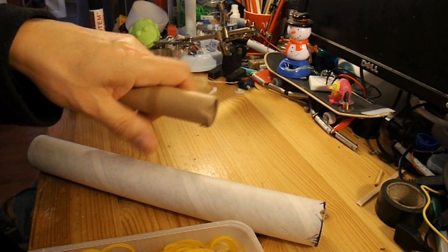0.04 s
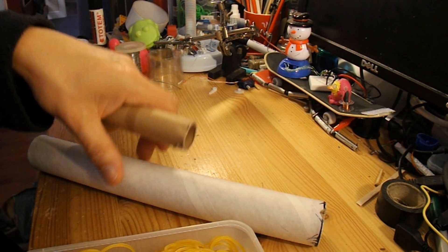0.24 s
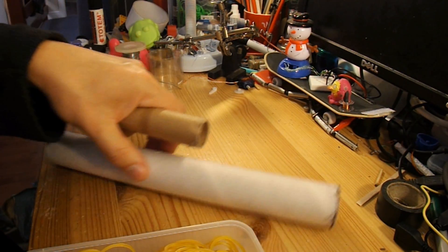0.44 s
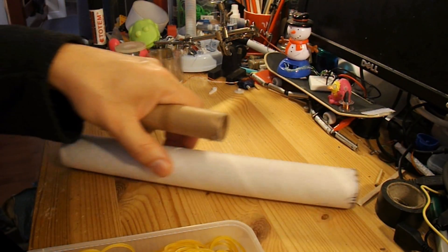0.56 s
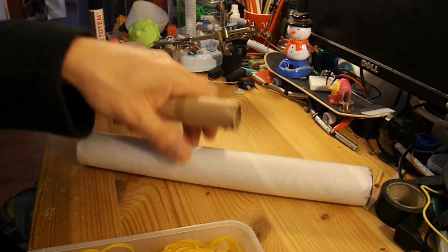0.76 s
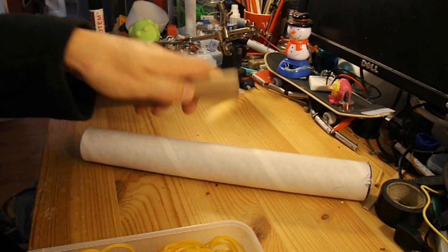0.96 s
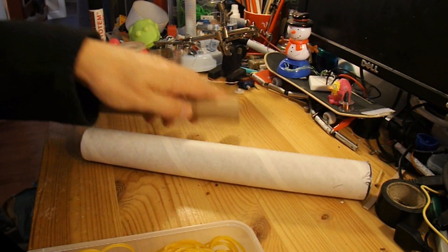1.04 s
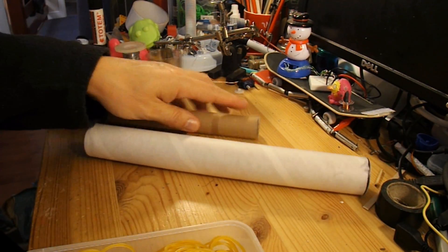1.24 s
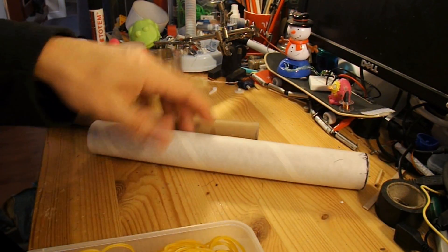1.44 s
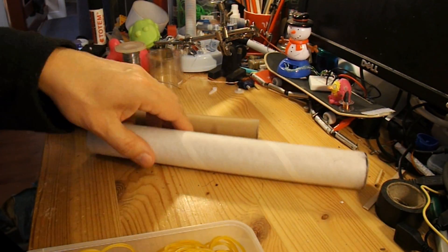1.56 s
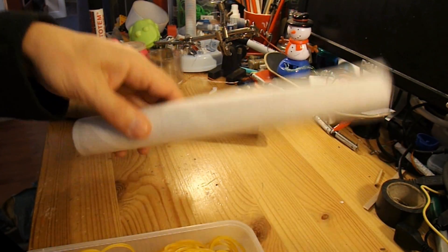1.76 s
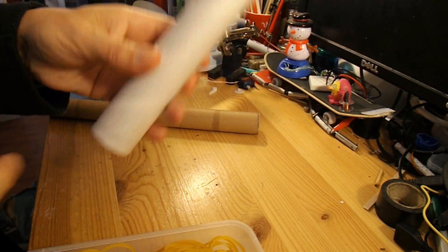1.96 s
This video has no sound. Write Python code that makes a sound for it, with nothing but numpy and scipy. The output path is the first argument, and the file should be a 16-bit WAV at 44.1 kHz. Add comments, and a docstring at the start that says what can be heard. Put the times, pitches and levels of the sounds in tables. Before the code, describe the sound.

Cardboard tubes handled on a wooden desk, with one brief clattering knock as one is set down.

```python
"""First, fingers brush cardboard close to the microphone, over a soft hiss and a thin electrical whine.
The place is a small room, with two cardboard tubes on a wooden desk. One tube slides over the wood in
tiny slips, sings faintly and gives a few sharp little ticks. The other is set down, knocks end to end
and settles, tube and desk ringing together. Near echoes and a short room tail follow the handling."""
import sys
import numpy as np
from scipy import signal
from scipy.fft import rfft, irfft
from scipy.io import wavfile

SR = 44100
rng = np.random.default_rng(int(sys.argv[2]) if len(sys.argv) > 2 else 0)


def waveform_to_disk(signal):
    """Save audio, clipped to [-1, 1], as 16-bit WAV at the path in sys.argv[1]."""
    frames = np.transpose(np.atleast_2d(signal))
    scaled = np.clip(frames, -1, 1) * 32767
    samples = np.round(scaled).astype(np.int16)
    wavfile.write(sys.argv[1], SR, samples)


N = 88508

# Levels in the tables are relative.
# spectrum of the hiss: f/Hz, level/dB
HISS_COLOUR = [(25, -17), (80, -17.5), (160, -10.5), (300, -4.5), (550, 0), (1100, -2), (1600, -4.5),
               (2400, -3.5), (2680, 0), (3100, -7.5), (5500, -13), (7000, -11.5), (9500, -7.5),
               (12500, -13.5), (16000, -17)]
# likeness of left and right in the hiss: f/Hz, correlation/0-1
HISS_LIKENESS = [(50, .9995), (1000, 1), (2200, 1), (3800, 1), (7500, 0), (14000, .05)]
# echoes off things near the desk: delay/s, gain
NEAR_ECHOES = [(.0027, .14), (.0058, 0.072), (.0078, 0.12)]
# the room's decay: f/Hz, t60/s
ROOM_DECAY = [(120, 0.62), (300, 0.27), (1000, 0.13), (3000, .19), (8000, 0.18), (15000, 0.081)]
# what the room returns: f/Hz, level/dB
ROOM_COLOUR = [(150, -3), (500, -2.5), (1100, 0.5), (2500, -1), (6000, 0.5), (12000, 2)]
# likeness of left and right in the room's tail: f/Hz, correlation/0-1
ROOM_LIKENESS = [(50, 1), (1000, 1), (3000, 1), (7000, 0.57), (14000, 0)]
# fingers brushing the card: t/s, level/dB
BRUSH_STROKE = [(0, -58), (.07, -64.5), (.22, -62.5), (.3, -74), (.42, -62), (.53, -55), (.6, -58.5),
                (.72, -56), (.78, -63), (.89, -68.5), (.97, -57), (1.1, -60.5), (1.15, -63), (1.49, -64.5),
                (1.525, -53.5), (1.57, -60.5), (1.62, -55.5), (1.66, -60), (1.745, -54), (1.795, -66.5),
                (1.84, -64), (2.01, -62)]
# spectrum of fingers on card: f/Hz, level/dB
BRUSH_COLOUR = [(880, -50), (1500, -16), (2210, -19), (2860, -18.5), (3880, -10.5), (5170, -8), (6890, -3),
                (10100, -12), (13500, -20), (15400, -24), (16000, -54)]
# card sliding on wood: t/s, level/dB
SLIDE_STROKE = [(0, -68), (.25, -78), (.39, -73), (.48, -55), (.55, -56.5), (.605, -64.5), (.64, -58.5),
                (.705, -54), (.76, -67.5), (.9, -79), (.96, -61.5), (1.03, -72), (1.09, -65.5),
                (1.16, -67.5), (1.6, -63.5), (1.8, -84), (1.89, -74.5), (1.94, -62), (2.01, -66.5)]
# spectrum of card on wood: f/Hz, level/dB
SLIDE_COLOUR = [(47, -54), (80, -21), (119, -7), (190, -20), (246, -5.5), (429, -6.5), (758, -7.5),
                (1040, -3), (1320, -3.5), (2000, -12.5), (2260, -3.5), (3360, -18.5), (3790, -6.5),
                (4430, -18.5), (5000, -28), (6500, -12), (11000, -120)]
# the sliding tube sings faintly: t/s, level/dB
SQUEAK_SWELL = [(.4, -100), (.46, -65), (.51, -72), (.54, -69), (.568, -54.5), (.587, -61), (.63, -100)]
# the card catches as it slides: t/s, dull scuff level/dB, bright scuff level/dB
CATCHES = [(.087, -34, -56), (.413, -31.5, -49), (0.507, -37, -31), (.5295, -25, -31), (0.721, -48, -26.5),
           (1.526, -35, -44), (1.910, -36.5, -66)]
# soft bumps of fingers and tube: t/s, level/dB, f/Hz, t60/s
BUMPS = [(0.088, -55, 940, 0.041), (.530, -51, 246, 0.081), (0.536, -44, 389, 0.038),
         (0.53, -57.5, 144, 0.11), (.722, -52, 330, .22), (1.611, -47.5, 1493, 0.036),
         (1.91, -48, 477, 0.037), (1.912, -60, 243, 0.11)]
# sharp ticks of the handled tube: t/s, level/dB, f/Hz
TICKS = [(.9093, -40, 8500), (0.9199, -22, 7430), (0.937, -16, 7640), (.9425, -36, 5330)]
# the thin spectrum of the ticks: f/Hz, level/dB
TICK_COLOUR = [(1200, -37), (2800, -3), (4300, 1.5), (5600, 1), (8000, -0.5), (11000, -2.5), (15000, -2)]
# the tube meets the desk: t/s, ring level/dB, ring pitch ratio, then level/dB in each knock band
KNOCKS = [(1.2486, -1, 0.99, -32, -30, -30.5, -29, -50.5, -31),
          (1.2922, -6, .97, -37, -36.5, -42.5, -51, -47, -46),
          (1.3086, -0.5, 1.0, -42, -31.5, -40.5, -52, -51, -64),
          (1.3240, -9, .96, -23.5, -19, -32, -40, -28.5, -32.5),
          (1.3277, -0.5, 1.0, -29.5, -30, -29, -24.5, -45.5, -47),
          (1.381, -10, 1.0, -27, -18, -14.5, -28.5, -26.5, -29),
          (1.3836, -4, 1.005, -31.5, -30.5, -21, -23.5, -37, -36),
          (1.4180, -8.5, 1.02, -31, -25.5, -27, -37, -41, -52),
          (1.461, -18, 0.77, -38, -33.5, -67, -55, -70, -62)]
# the six knock bands, bass to top: f/Hz
KNOCK_BANDS_HZ = [150, 450, 1100, 2500, 5500, 11000]
# tube and desk ring together: f/Hz, level/dB, t60/s
TUBE_DESK_MODES = [(138, -25.5, 0.11), (247, -19, 0.19), (430, -14.5, 0.066), (561, -4, 0.054),
                   (625, -16.5, 0.054), (731, -7.5, 0.067), (936, -3.5, 0.12), (986.5, -0.5, 0.052),
                   (1068.6, 0, 0.043), (1256, -5.5, 0.033), (1600, -11.5, 0.026), (2140, -11.5, 0.026),
                   (2506, -1.5, 0.031), (3988, 0, 0.055), (6450, -2.5, .03)]
# the crack of contact and the dense short ring of the card: f/Hz, level/dB
CONTACT_COLOUR = [(30, -35), (170, -18), (290, -10.5), (560, 2), (820, -1.5), (1150, 5), (1900, -4.5),
                  (2700, 3), (3500, -3), (4400, -4.5), (7000, -2.5), (10000, -20), (15000, -31)]

LEFT_LAG_S = 2.1e-5  # sound reaches the left side of the microphone this much later


def amp(db):
    """Decibels to gain."""
    return 10 ** (np.asarray(db) / 20)


def unit(x):
    """Scales to rms 1."""
    return x / np.sqrt(np.mean(x ** 2) + 1e-20)


def read(points, hz):
    """Reads a table along log frequency."""
    f, value = np.transpose(points)
    return np.interp(np.log(hz + 1), np.log(f + 1), value)


def add(mix, start, sound):
    """Mixes a sound in at a start time in seconds."""
    part = mix[max(round(start * SR), 0):][:len(sound)]
    part += sound[:len(part)]


def seconds(length):
    """A time axis."""
    return np.arange(int(length * SR)) / SR


def decay(t, t60):
    """Falls by 60 dB in t60 seconds."""
    return np.exp(-np.log(1000) * t / t60)


def note(t, hz, t60):
    """A dying sine."""
    return decay(t, t60) * np.sin(2 * np.pi * hz * t)


def burst(t, t60):
    """Dying noise of energy 1."""
    noise = rng.standard_normal(len(t)) * decay(t, t60)
    return noise / np.linalg.norm(noise)


def colour(x, spectrum):
    """Minimum-phase filter whose gain follows a table of f/Hz, level/dB."""
    hz = np.fft.rfftfreq(4096, 1 / SR)
    log_gain = np.log(amp(np.maximum(read(spectrum, hz), -100)))
    mirrored = np.r_[log_gain, log_gain[-2:0:-1]]
    taps = np.fft.ifft(np.exp(np.conj(signal.hilbert(mirrored)))).real
    return signal.fftconvolve(x, taps[:len(hz)])[:len(x)]


def diffuse(likeness, size):
    """Two channels of noise, alike in the bass and less so in the treble."""
    a, b = rfft(rng.standard_normal((2, size)))
    same = np.clip(read(likeness, np.fft.rfftfreq(size, 1 / SR)), 0, 1)
    mid, side = a * np.sqrt((1 + same) / 2), b * np.sqrt((1 - same) / 2)
    return irfft(np.array([mid + side, mid - side]), size)


def background(hiss_db=-65, whine_hz=9778.7, whine_db=-63.5):
    """Steady hiss and a thin electrical whine, under everything."""
    hiss = unit(np.array([colour(side, HISS_COLOUR) for side in diffuse(HISS_LIKENESS, N)]))
    arrival = np.arange(N) / SR - np.array([[LEFT_LAG_S], [0]])
    whine = np.sqrt(2) * np.sin(2 * np.pi * whine_hz * arrival)
    return amp(hiss_db) * hiss + amp(whine_db) * whine


def room_tail(rise_s=0.0094):
    """The small room's diffuse answer: it builds quickly and lingers longest in the bass."""
    hz, t, spectra = signal.stft(diffuse(ROOM_LIKENESS, SR // 2), SR, nperseg=256)
    level_db = read(ROOM_COLOUR, hz)[:, None] - 60 * t / read(ROOM_DECAY, hz)[:, None]
    tail = signal.istft(spectra * amp(level_db), SR, nperseg=256)[1]
    tail *= 1 - np.exp(-(np.arange(tail.shape[1]) / SR / rise_s) ** 2)
    return tail / np.linalg.norm(tail[0])


def from_desk(x, room_db):
    """Desk to microphone, close and a little to the right: direct path, near echoes and room tail."""
    near = x.copy()
    for delay, gain in NEAR_ECHOES:
        add(near, delay, gain * x)
    room = signal.fftconvolve(x[None], room_tail(), axes=1)[:, :N]
    lag = np.exp(-2j * np.pi * np.fft.rfftfreq(2 * N, 1 / SR) * np.array([[LEFT_LAG_S], [0]]))
    return irfft(rfft(near + amp(room_db) * room, 2 * N) * lag)[:, :N]


def friction(stroke, spectrum, slips_per_s=9000, spread_db=2.0):
    """Dense tiny slips, coloured by the card, following the stroke's level."""
    slips = rng.standard_normal(N) * (rng.random(N) < slips_per_s / SR)
    slips *= amp(spread_db * np.minimum(rng.exponential(1, N), 4))
    level_db = np.interp(np.arange(N) / SR, *np.transpose(stroke))
    return amp(level_db) * unit(colour(slips, spectrum))


def squeak(hz=3975, width_hz=120):
    """Friction feeds one narrow resonance of the sliding tube."""
    t = np.arange(N) / SR
    pole = np.exp(-2 * np.pi * width_hz / SR)
    noise = rng.standard_normal(N) + 1j * rng.standard_normal(N)
    flutter = signal.lfilter([1], np.poly([pole, pole]), noise)
    level_db = np.interp(t, *np.transpose(SQUEAK_SWELL))
    return amp(level_db) * unit((flutter * np.exp(2j * np.pi * hz * t)).real)


def catches(t60=0.019, gain_db=11.5):
    """Short scuffs where the card sticks and lets go."""
    out, t = np.zeros(N), seconds(.2)
    for start, dull_db, bright_db in CATCHES:
        add(out, start, amp(dull_db) * colour(burst(t, t60), SLIDE_COLOUR))
        add(out, start, amp(bright_db) * colour(burst(t, t60), BRUSH_COLOUR))
    return amp(gain_db) * out


def bumps(rise_s=0.0018):
    """Soft touches of fingers and tube, each with one dull note."""
    out, t = np.zeros(N), seconds(.5)
    onset = 1 - np.exp(-t / rise_s)
    for start, db, hz, t60 in BUMPS:
        add(out, start, amp(db) * onset * note(t, hz, t60))
    return out


def ticks(rise_s=0.00012, ring_db=-34):
    """The handled tube gives snaps of a few cycles, each with a faint high ring."""
    out, t = np.zeros(N), seconds(.5)
    ring = amp(ring_db) * note(t, hz=7300, t60=.03)
    pulse = t / rise_s * np.exp(1 - t / rise_s)
    for start, db, hz in TICKS:
        snap = pulse * np.sin(2 * np.pi * hz * t)
        add(out, start, amp(db) * (snap + ring))
    return colour(out, TICK_COLOUR)


def knocks(crack_db=25, crush_db=24, card_db=27):
    """Each blow cracks and rings tube and desk; level and pitch shift with the point of contact."""
    out, t = np.zeros(N), seconds(.5)
    crack = amp(crack_db) * (t == 0)
    for start, ring_db, pitch_ratio, *band_db in KNOCKS:
        ring = sum((-1) ** k * amp(db) * note(t, pitch_ratio * hz, t60)
                   for k, (hz, db, t60) in enumerate(TUBE_DESK_MODES))
        crush = amp(crush_db) * burst(t, t60=.007)  # the fibres give way for a few milliseconds
        card_shake = amp(card_db) * burst(t, t60=.04)
        blow = amp(ring_db) * ring + colour(crack + crush + card_shake, CONTACT_COLOUR)
        add(out, start, colour(blow, list(zip(KNOCK_BANDS_HZ, band_db))))
    return out


def scene():
    """At the microphone: knocks, ticks and rubbing from the desk, over the background."""
    slide = friction(SLIDE_STROKE, SLIDE_COLOUR)
    fingers = friction(BRUSH_STROKE, BRUSH_COLOUR)
    rubbing = slide + fingers + catches() + squeak() + bumps()
    return (from_desk(knocks(), room_db=-9) + from_desk(ticks(), room_db=-17.5)
            + from_desk(rubbing, room_db=-15) + background())


def record(dry):
    """The recorder's band limit."""
    cutoff_hz = 16200
    lowpass = signal.firwin(255, cutoff_hz, window=("kaiser", 8), fs=SR)
    return signal.oaconvolve(dry, lowpass[None], "same")


dry = scene()
out = record(dry)
waveform_to_disk(out)
```